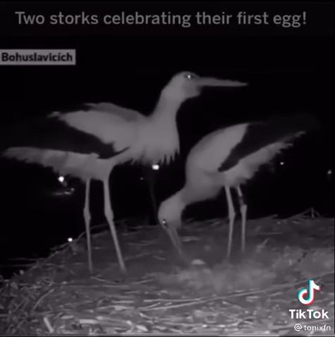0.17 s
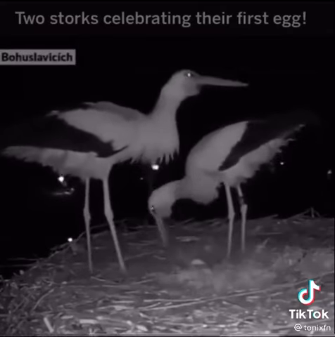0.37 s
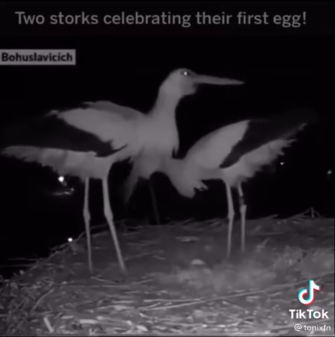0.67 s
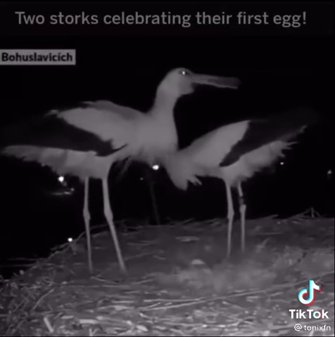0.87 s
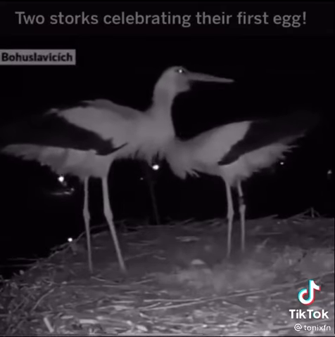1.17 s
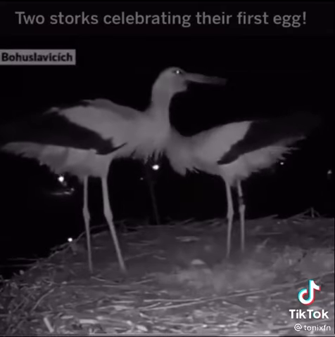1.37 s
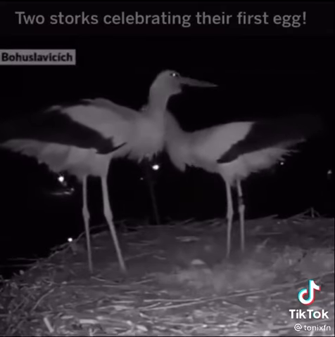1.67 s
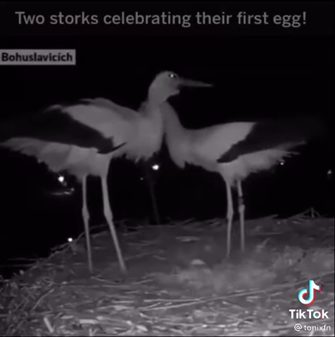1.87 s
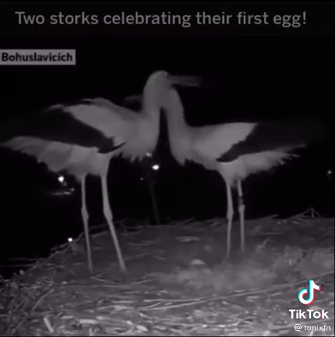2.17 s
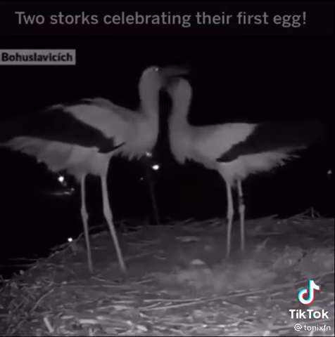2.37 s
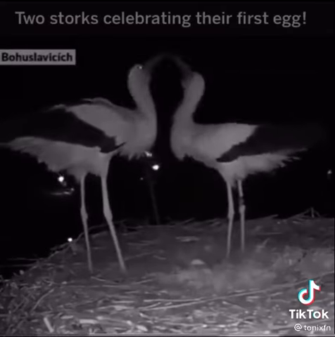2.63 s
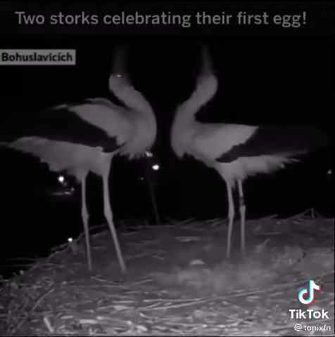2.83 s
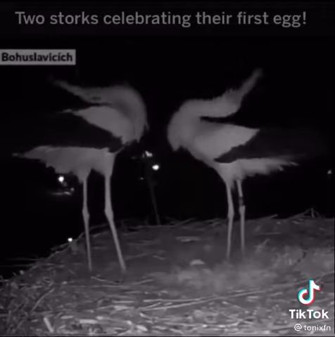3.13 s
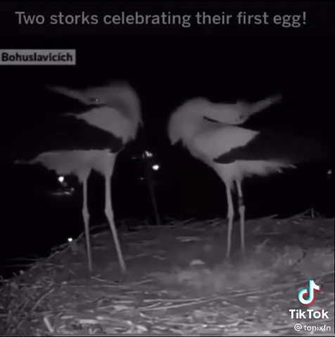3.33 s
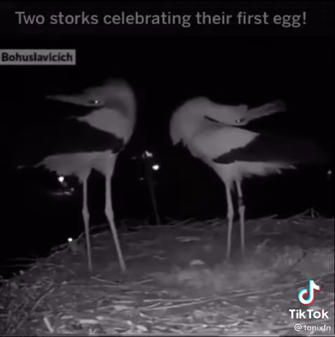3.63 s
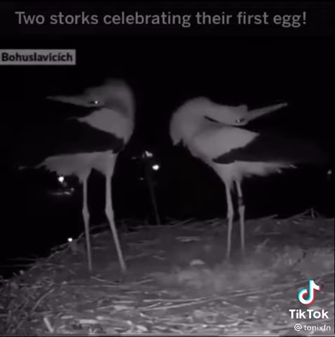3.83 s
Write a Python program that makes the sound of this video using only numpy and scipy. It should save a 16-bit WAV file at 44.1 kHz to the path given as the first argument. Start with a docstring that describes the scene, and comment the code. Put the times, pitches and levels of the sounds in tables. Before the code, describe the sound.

Dry, hollow wooden bill claps from a single stork, soon overlapped by another's, drifting in and out of step and growing crackier; close single microphone on a nest, little echo, faint night hush.

```python
"""Two storks clatter their bills on the nest at night, over a steady far hush of shaped noise.
One starts alone amid rustling straw, grainy swells of noise; the second joins at its own pace.
Each clap is a noise crack plus damped sines, the resonances of bill and throat, with echo and nest scatter.
Their tone changes as the necks rise and are thrown back; late on, low noise puffs buffet the microphone,
and the same grainy noise gives a short tick, then sizzling tails just after some claps."""
import sys
import numpy as np
from scipy import signal
from scipy.fft import rfft, irfft
from scipy.io import wavfile

SR = 44100
rng = np.random.default_rng(int(sys.argv[2]) if len(sys.argv) > 2 else 0)


def wav_out(sig):
    """Save sig, one row per channel (or a flat mono array), as 16-bit PCM at SR to the path in sys.argv[1]."""
    wavfile.write(sys.argv[1], SR, np.round(np.clip(np.atleast_2d(sig).T, -1, 1) * 32767).astype(np.int16))


N = 176400  # 4 s

# claps of each bird: t/s, relative level/dB, pitch ratio, brightness/(dB per octave), relative crack level/dB
FIRST_CLAPS = [(0.0601, -2.5, 0.98, -0.7, 0), (0.1946, 0.3, 0.98, -0.3, -3), (0.3285, -1.5, 1, -0.2, 2),
               (0.4629, 0, 1, 0.7, -2.5), (0.5939, 0.35, 1, -0.6, -1.5), (0.724, -0.1, 1.015, -1.5, 0.5),
               (0.854, -0.0, 1.01, -1.5, 1.5), (0.9852, 1.3, 1.006, -0.5, -2),
               (1.1184, 1.6, 1.009, -2.7, -2.5), (1.2502, -0.1, 1.02, 0.6, -0.5),
               (1.3807, 0.3, 1.025, -1.6, 1), (1.5117, 0.5, 1.026, -1.4, -2.5),
               (1.6448, -4.5, 1.05, -2.9, 2), (1.779, -2.7, 1.04, -4.5, 0), (1.9075, -0.1, 1.063, -2.8, 2),
               (2.0357, 1.1, 1.08, -3, 0), (2.1624, 2, 0.97, -0.8, -1.5), (2.2852, 4, 0.98, -1, -1.5),
               (2.4099, 2.2, 1, -0.5, -0.5), (2.5344, 1.5, 0.994, -0.2, 5.5),
               (2.6527, 0.6, 1.03, -1.5, 3.5), (2.7604, 0.7, 1, -1.3, 5), (2.8724, -0.5, 1.04, -2, 3.5),
               (2.9849, -3, 0.966, -1.5, 1), (3.0893, -1.7, 0.958, 0.5, 6), (3.1916, -4.5, 0.987, 3.5, -2),
               (3.2926, 1.5, 0.98, 0.5, 2.5), (3.3945, 1.3, 0.99, 1, 1), (3.4945, 1.3, 0.97, 0.8, 2.5),
               (3.5963, 0.8, 0.99, -1, 5.5), (3.6969, 0.1, 0.98, 1.2, 4), (3.7988, -1.5, 0.97, 0.2, 8),
               (3.9009, -0.4, 0.96, -0.5, 3)]
SECOND_CLAPS = [(0.8789, -15, 1, -2.5, 5), (1.0379, -9, 0.97, -4.5, 4), (1.1897, -5, 0.96, -2.1, -1),
                (1.3393, -1.1, 0.95, -1.9, -5), (1.4859, -1.1, 0.97, -1, -10),
                (1.6286, -0.7, 0.97, -0.2, -7), (1.7724, -0.6, 0.92, 1.5, -1),
                (1.9141, -4.4, 0.96, -4, 0.5), (2.0516, -2, 0.987, -0.9, -2),
                (2.1871, -0.6, 1.002, -1.5, 2), (2.32, -1.6, 1, 1.7, 0.5), (2.4455, -2.7, 1.066, -2.5, 8),
                (2.5765, -1, 1.05, 1.5, 6), (2.7038, -0.8, 1.06, 1.3, 5), (2.8295, 0.8, 1.06, 0.2, 7),
                (2.9517, 0.4, 1.064, -0.0, 6), (3.071, 0, 1, 1.4, 1), (3.1916, -3, 0.973, 2, 6),
                (3.3117, -2, 0.96, -1.4, 0), (3.4272, -0.5, 0.95, -0.5, 1.5),
                (3.5443, -0.5, 0.98, 0.5, 3.5), (3.6602, 0.1, 0.97, 0, 1), (3.7771, -0.1, 1.03, -1.2, 4),
                (3.8941, 0.3, 0.98, 0.6, 3.5)]
# neck posture: t/s, posture (0 = bill forward, 1 = bill raised, 2 = head thrown back)
FIRST_NECK = [(1.5, 0.24), (2.04, 0.16), (2.17, 0.71), (2.868, 1.05), (3.08, 2.3)]
SECOND_NECK = [(1.8, .03), (2.44, 0.65), (2.95, 0.77), (3.12, 1.74)]
# resonances of bill and throat, before the pitch ratio and level changes of each clap:
# t60/s, forward f/Hz, level/dB, raised f/Hz, level/dB, thrown back f/Hz, level/dB
FIRST_BILL = [(0.02,690,-15.5,787,-17.5,874,-14.5), (0.0022,840,-13.5,1040,-11.5,1140,-11),
              (0.011,1520,-48,2580,-24,1526,-8), (0.016,1626,-10,1716,-9,1624,-9),
              (0.012,2150,-10.5,2243,-15.5,2124,-10.5), (0.014,2280,-11.5,2524,-18,2820,-14.5),
              (0.012,2820,-18.5,2920,-22,3350,-16), (0.011,3625,-18,3620,-25,3980,-21),
              (.012,4270,-28.5,4050,-24,3600,-35), (0.0089,5100,-42,4990,-24,5150,-26.5),
              (0.0052,6370,-31,6700,-53,6120,-20.5)]
SECOND_BILL = [(0.021,734,-20,802,-16,877,-18), (0.011,1780,-75,2950,-55,1220,-7),
               (0.016,1660,-15,1635,-8,1690,-8), (0.011,2213,-18.5,2234,-20,2120,-8.5),
               (0.017,2408,-9.5,2410,-13,2670,-5), (0.014,3150,-17,3020,-20.5,3240,-7),
               (.016,3910,-25,3580,-26.5,4030,-14.5), (0.019,4760,-35.5,4220,-39.5,4000,-27.5),
               (0.011,5100,-59,5240,-21,5170,-35), (0.0086,8200,-58,6518,-31,6830,-32.5)]
# spectral shape of the dry crack of the horn edges: f/Hz, relative level per Hz/dB
CRACK_SPECTRUM = [(2000, 7), (4500, 4.5), (6500, -1.5), (8700, -11.5), (11000, -13), (13500, -27)]
# grainy noises, first three straw rustles, then a short tick, then three sizzling tails of claps:
# middle t/s, half length (to 1/e) t/s, level before graininess/dB
GRAINY_SWELLS = [(.075, 0.033, -45.5), (.265, 0.035, -54.5), (.545, 0.013, -58), (2.627, 0.0028, -44.5),
                 (3.1, 0.015, -53), (3.812, 0.015, -55), (3.912, 0.023, -54)]
# spectral shape shared by the rustles, tick and sizzles: f/Hz, relative level per Hz/dB
GRAINY_SPECTRUM = [(600, -45), (930, 10.5), (1300, -9.5), (1800, -59), (2150, 8), (2310, 5), (2550, -6),
                   (3110, 5.5), (3350, 5.5), (3900, -10), (4640, -14), (5600, -19), (7000, -17),
                   (8500, -30), (13000, -47)]
# low puffs of air: middle t/s, half length (to 1/e) t/s, level/dB
PUFFS = [(2.26, 0.064, -59.5), (3.16, 0.041, -60), (3.738, 0.021, -51.5), (3.85, 0.057, -61)]
# spectral shape of a puff: f/Hz, relative level per Hz/dB
PUFF_SPECTRUM = [(25, -11), (55, -1), (80, -7), (130, -18), (300, -50)]
# spectral shape of the night background: f/Hz, relative level per Hz/dB
HUSH_SPECTRUM = [(20, -7.5), (35, -11), (60, -4.5), (110, -7), (220, -5), (430, -1.5), (600, -1), (760, 0),
                 (1000, -3.5), (1600, -6), (2100, -5.5), (2700, -14), (3700, -19), (5400, -28.5),
                 (7500, -36), (11500, -39), (13300, -58)]

CLAP_S, BODY_LOW_HZ = 0.08, 450  # length of one clap; lower limit of its direct sound
BRIGHTNESS_PIVOT_HZ = 1600  # brightness tilts the resonances about this frequency
CONTACT_DB = 1.93  # each clap stirs the resonances a little differently (standard deviation)
RING_BUILD_S, RING_TOP_HZ = 0.00072, 7640  # the ring takes a moment to speak; soft contact dulls its top
CRACK_DB, CRACK_T60_S = -33.5, 0.015
CRACK_BUILD_S = 0.00077  # the long edges do not meet all at once
SPLASH_DB, SPLASH_T60_S = -14, 0.048  # the crack's faint tail, relative to its main decay
ECHO_S, ECHO_DB, ECHO_FALL_DB = 0.0068, -20.5, 13  # delay, level bill forward, fall per unit of posture
NEST_DB, NEST_T60_S, NEST_DELAY_S = -17.5, 0.018, 0.004  # scatter from the twigs
HUSH_DB = -54.5
CUTOFF_HZ = 13800


def stork(claps, neck, bill):
    """Superposition: one bird's claps add up, each coloured by the neck posture at its onset."""
    out = np.zeros(N + SR)  # spare second for the last clap
    neck_times, postures = np.transpose(neck)
    for onset, db, pitch, brightness, crack_db in claps:
        posture = np.interp(onset, neck_times, postures)
        sound = from_db(db) * clap(bill, posture, pitch, brightness, crack_db)
        start = int(onset * SR)
        out[start:start + len(sound)] += sound
    return out[:N]


def clap(bill, posture, pitch, brightness, crack_db):
    """Impact excitation: meeting mandibles crack and ring, then the surroundings return the knock."""
    t = np.arange(int(CLAP_S * SR)) / SR
    ring = hollow_ring(t, bill, posture, pitch, brightness)
    crack = edge_crack(t, crack_db)
    highpass = signal.butter(5, BODY_LOW_HZ, "high", fs=SR, output="sos")
    knock = signal.sosfilt(highpass, ring + crack)
    return knock + near_echo(t, knock, posture) + nest_scatter(t, knock)


def hollow_ring(t, bill, posture, pitch, brightness):
    """Modal resonance: the hollow of bill and throat sounds as a sum of exponentially damped sines."""
    modes = np.array(bill)
    # triangular weights mix the two nearest postures
    blend = np.maximum(0, 1 - abs(np.clip(posture, 0, 2) - np.arange(3)))
    t60 = modes[:, :1]
    hz = pitch * modes[:, 1::2] @ blend
    db = modes[:, 2::2] @ blend
    tilt_db = brightness * np.log2(hz / BRIGHTNESS_PIVOT_HZ)
    contact_db = CONTACT_DB * rng.standard_normal(len(hz))
    gains = from_db(db + tilt_db + contact_db)
    partials = dying(t, t60) * np.sin(2 * np.pi * hz[:, None] * t)
    build_up = 1 - np.exp(-t / RING_BUILD_S)
    lowpass = signal.butter(4, RING_TOP_HZ, fs=SR, output="sos")
    return signal.sosfilt(lowpass, gains @ partials * build_up)


def edge_crack(t, crack_db):
    """Broadband impact: the horn edges give a noise burst with a fast decay and a slower faint tail."""
    decay = dying(t, CRACK_T60_S) + from_db(SPLASH_DB) * dying(t, SPLASH_T60_S)
    build_up = 1 - np.exp(-t / CRACK_BUILD_S)
    return from_db(CRACK_DB + crack_db) * noise(CRACK_SPECTRUM, len(t)) * decay * build_up


def near_echo(t, knock, posture):
    """Specular reflection: one delayed copy of the knock, weaker as the bill turns upward."""
    gain = from_db(ECHO_DB - ECHO_FALL_DB * posture)
    return gain * np.interp(t - ECHO_S, t, knock, left=0)


def nest_scatter(t, knock):
    """Diffuse scattering: convolution with decaying noise stands for many weak returns from twigs."""
    twigs = rng.standard_normal(len(t)) * dying(t, NEST_T60_S) * (t > NEST_DELAY_S)
    unit_energy = twigs / np.linalg.norm(twigs)
    return from_db(NEST_DB) * signal.fftconvolve(knock, unit_energy)[:len(t)]


def rustles_tick_and_sizzles(grains_per_s=900, rough_db=3):
    """Amplitude modulation: a rapid random level makes swells of coloured noise grainy, as in dry rubbing."""
    grain_position = np.arange(N) / SR * grains_per_s
    grains = np.interp(grain_position, np.arange(N), rng.standard_normal(N))
    return swells(GRAINY_SWELLS) * from_db(rough_db * grains) * noise(GRAINY_SPECTRUM, N)


def air_puffs():
    """Pressure fluctuation: soft puffs on the microphone are swells of low-frequency noise."""
    return swells(PUFFS) * noise(PUFF_SPECTRUM, N)


def night_hush():
    """Stationary noise: the far hush keeps a constant colour and mean level."""
    return from_db(HUSH_DB) * noise(HUSH_SPECTRUM, N)


def swells(rows):
    """Amplitude envelope: the sum of Gaussian rises and falls."""
    t = np.arange(N) / SR
    return sum(from_db(db) * np.exp(-((t - middle) / half) ** 2) for middle, half, db in rows)


def noise(spectrum, size):
    """Spectral shaping: white noise is weighted in frequency, then scaled to unit standard deviation."""
    hz, db = np.transpose(spectrum)
    f = np.maximum(np.arange(size // 2 + 1) * SR / size, 1)  # keeps the logarithm finite
    weights = from_db(np.interp(np.log(f), np.log(hz), db))
    x = irfft(rfft(rng.standard_normal(size)) * weights, size)
    return x / x.std()


def dying(t, t60):
    """Exponential damping: the amplitude is 60 dB down at t60."""
    return np.exp(-np.log(1000) * t / t60)


def from_db(db):
    """Logarithmic level: decibels become an amplitude gain."""
    return 10 ** (np.asarray(db) / 20)


def scene():
    """Linear superposition: both birds, the grainy noises and the night air add in one channel."""
    first = stork(FIRST_CLAPS, FIRST_NECK, FIRST_BILL)
    second = stork(SECOND_CLAPS, SECOND_NECK, SECOND_BILL)
    return (first + second + rustles_tick_and_sizzles() + night_hush() + air_puffs())[None]


def record(dry):
    """Band limitation: a steep low-pass filter puts the top 60 dB down from the cutoff upward."""
    lowpass = signal.cheby2(14, 60, CUTOFF_HZ, fs=SR, output="sos")
    return signal.sosfilt(lowpass, dry)


dry = scene()
out = record(dry)
wav_out(out)
```